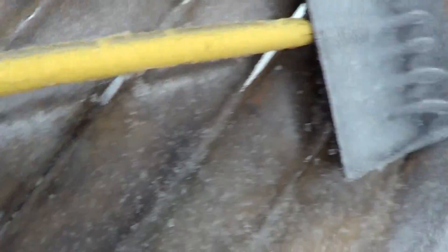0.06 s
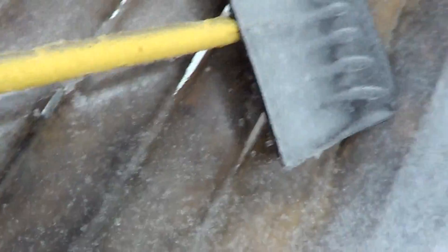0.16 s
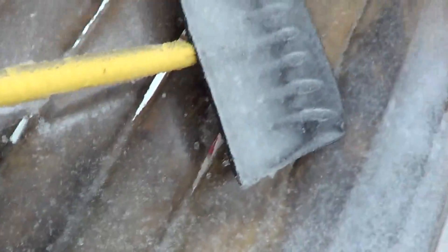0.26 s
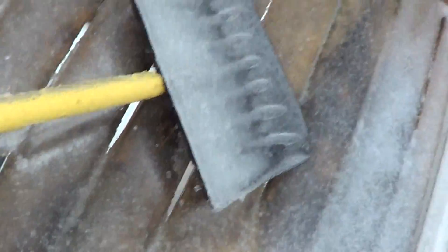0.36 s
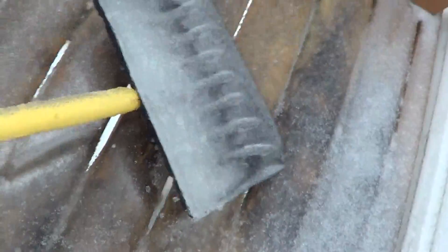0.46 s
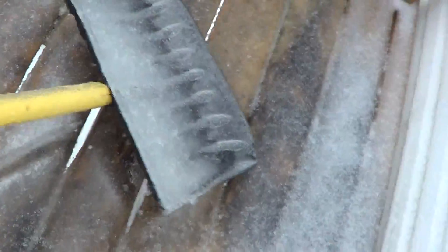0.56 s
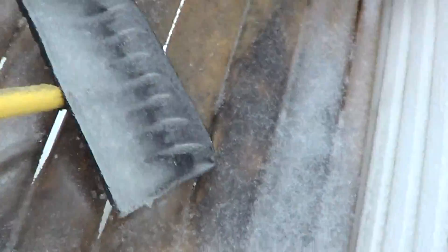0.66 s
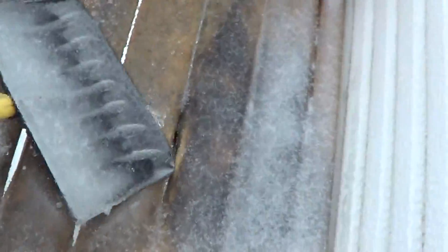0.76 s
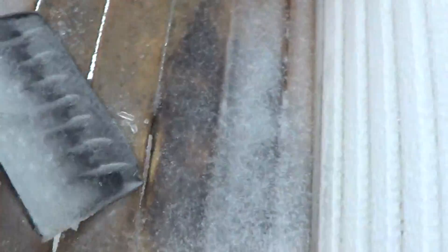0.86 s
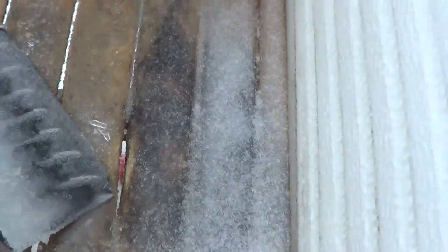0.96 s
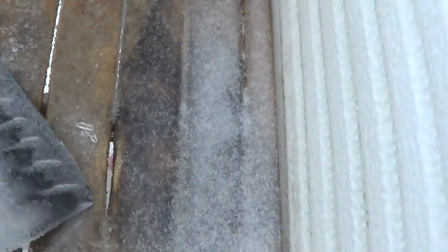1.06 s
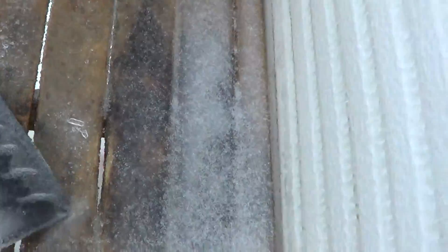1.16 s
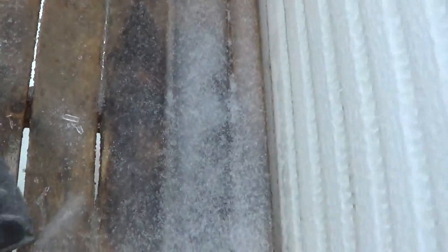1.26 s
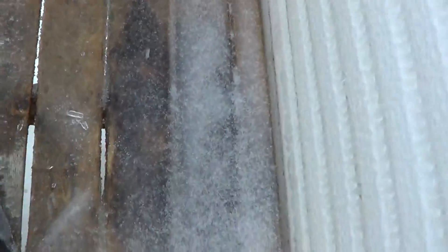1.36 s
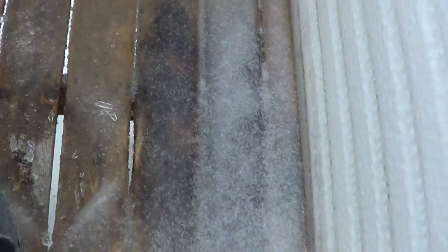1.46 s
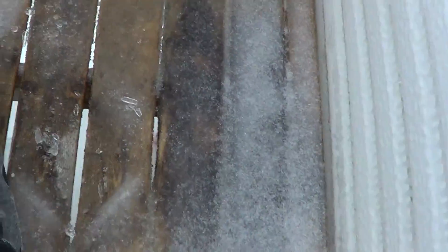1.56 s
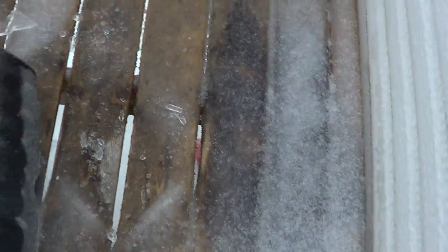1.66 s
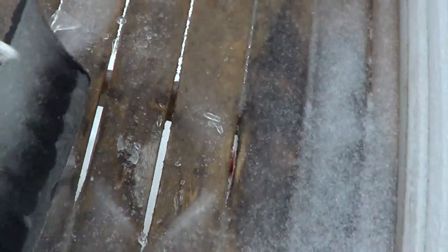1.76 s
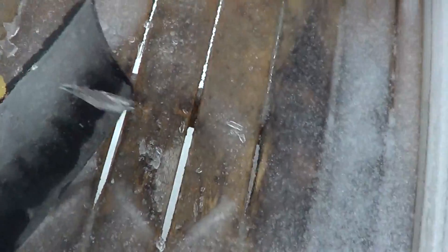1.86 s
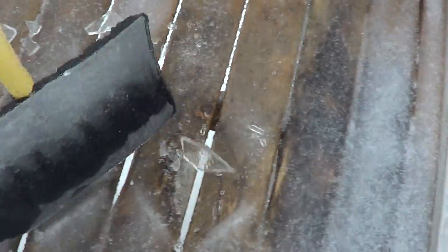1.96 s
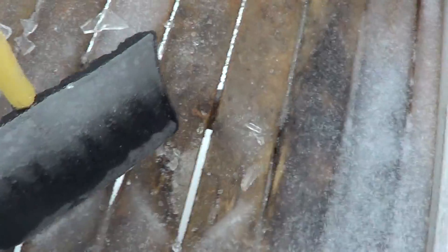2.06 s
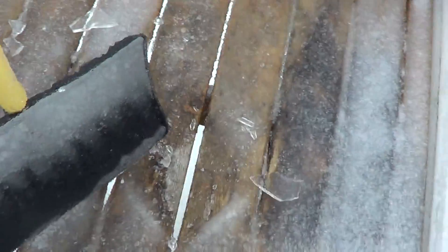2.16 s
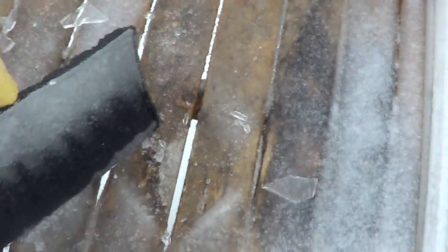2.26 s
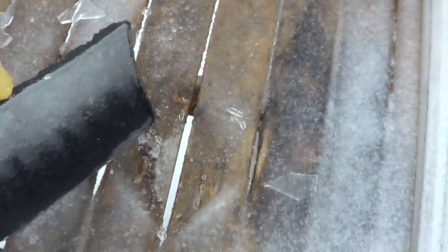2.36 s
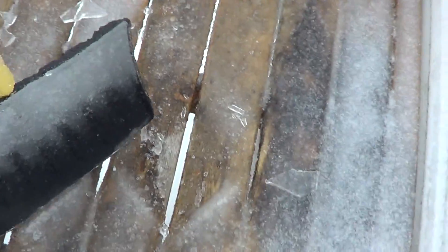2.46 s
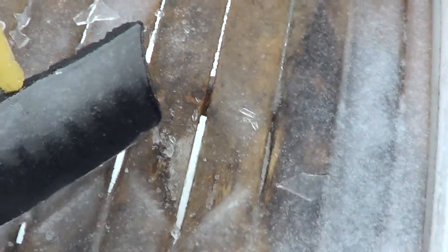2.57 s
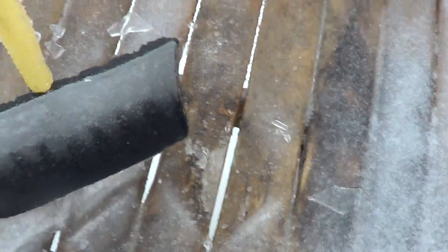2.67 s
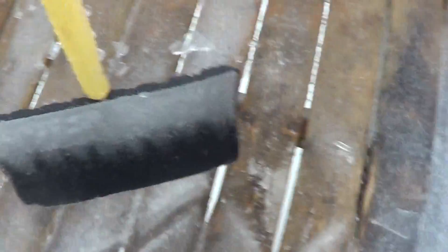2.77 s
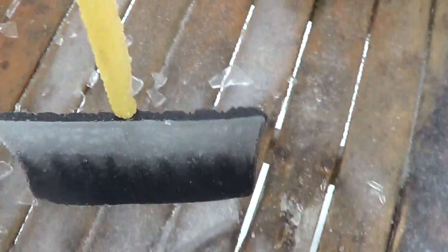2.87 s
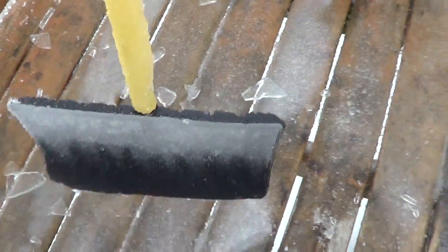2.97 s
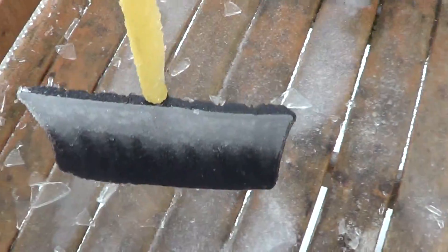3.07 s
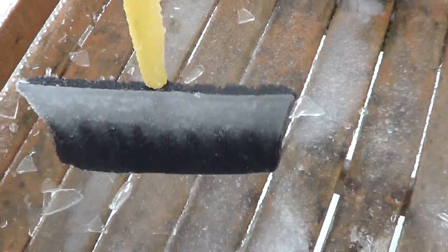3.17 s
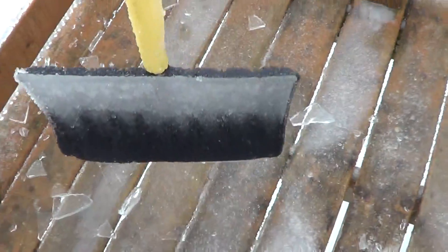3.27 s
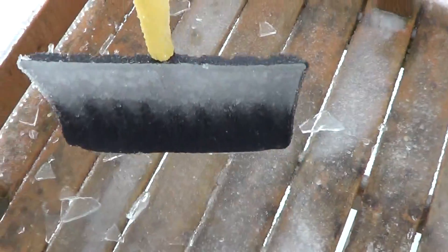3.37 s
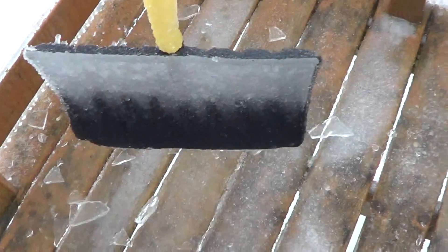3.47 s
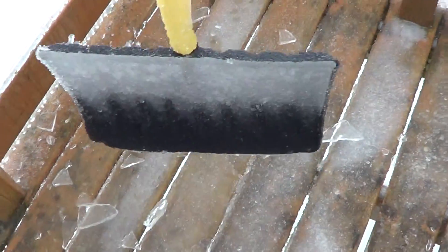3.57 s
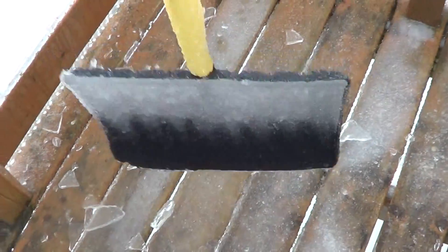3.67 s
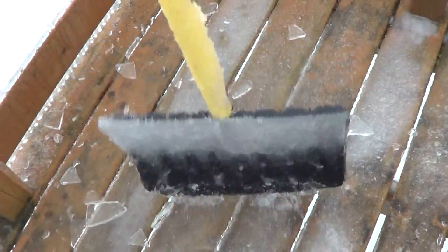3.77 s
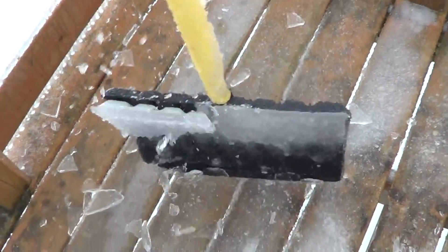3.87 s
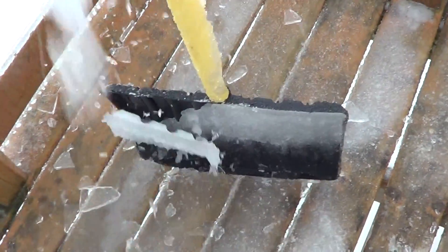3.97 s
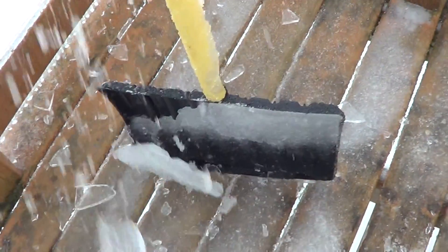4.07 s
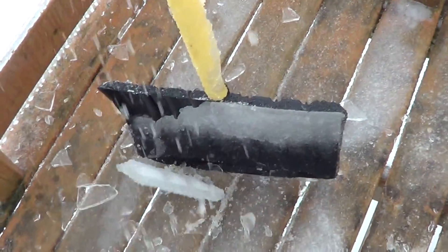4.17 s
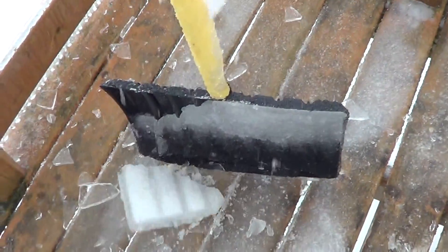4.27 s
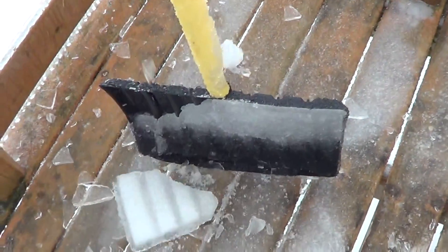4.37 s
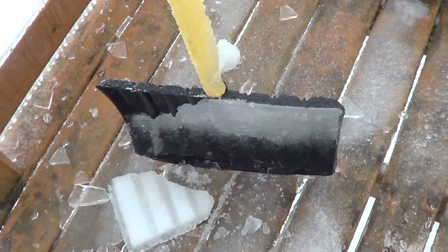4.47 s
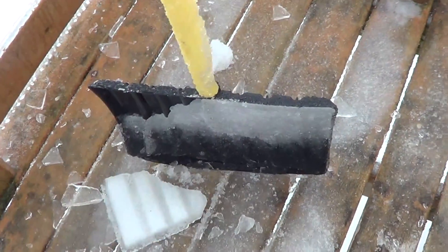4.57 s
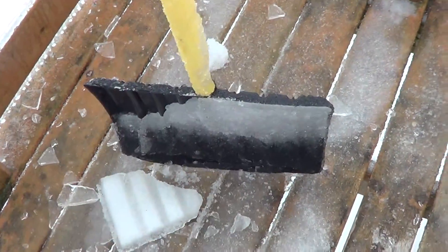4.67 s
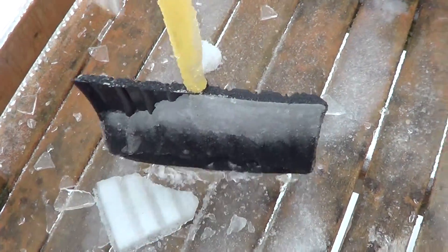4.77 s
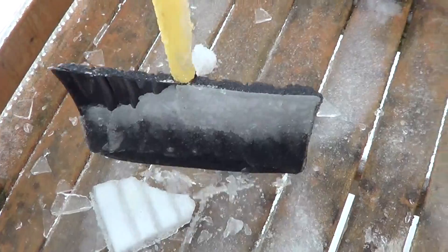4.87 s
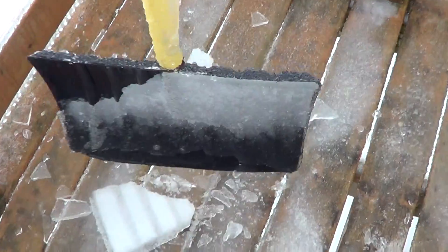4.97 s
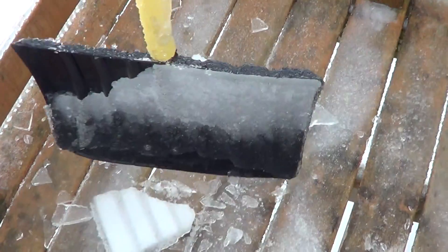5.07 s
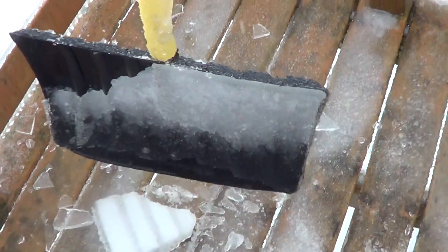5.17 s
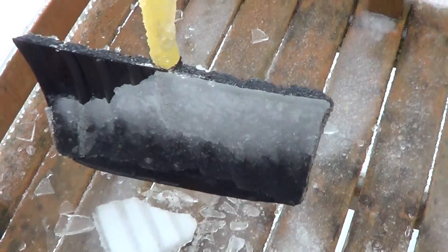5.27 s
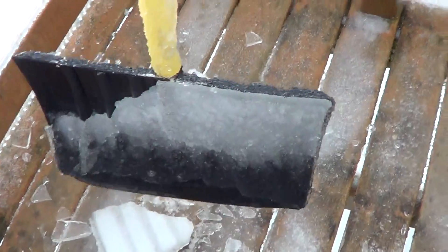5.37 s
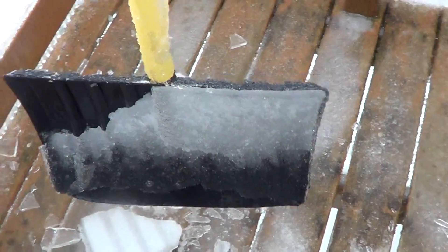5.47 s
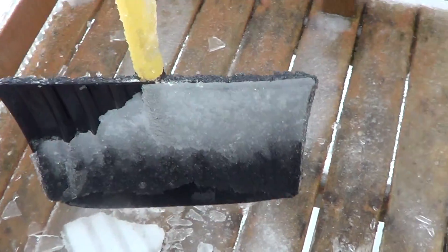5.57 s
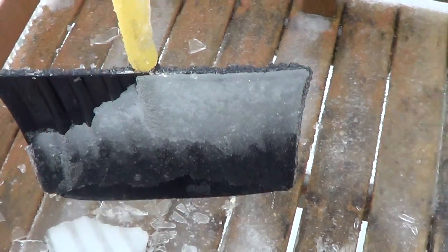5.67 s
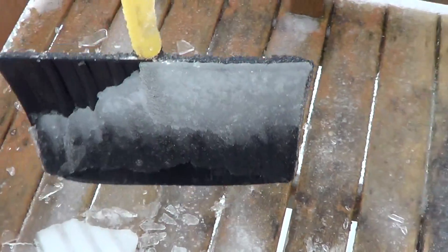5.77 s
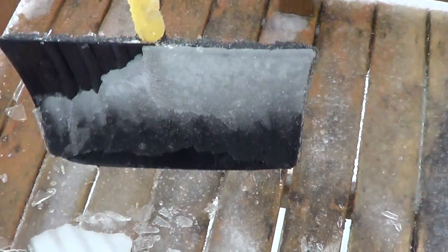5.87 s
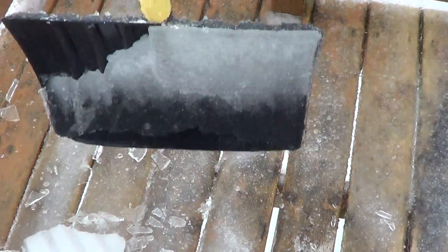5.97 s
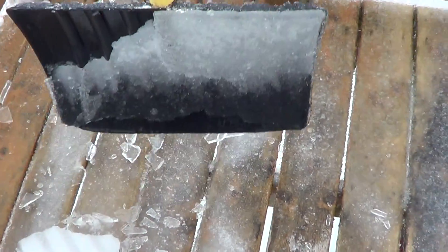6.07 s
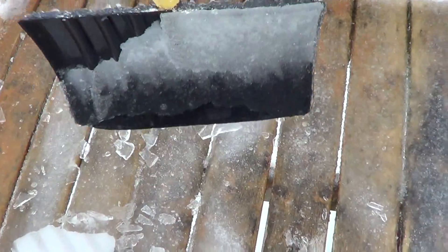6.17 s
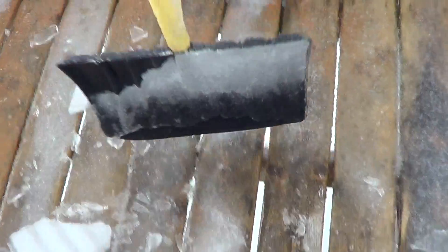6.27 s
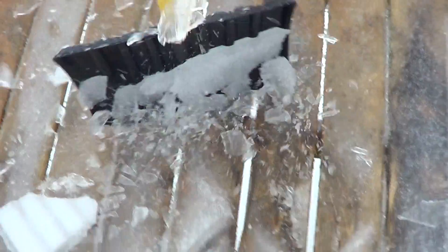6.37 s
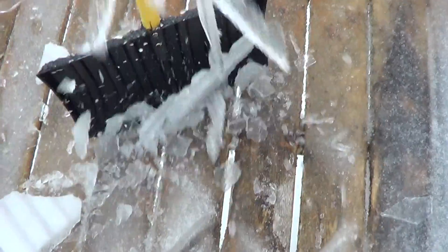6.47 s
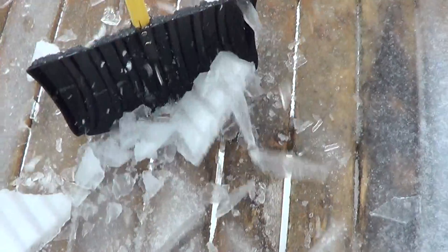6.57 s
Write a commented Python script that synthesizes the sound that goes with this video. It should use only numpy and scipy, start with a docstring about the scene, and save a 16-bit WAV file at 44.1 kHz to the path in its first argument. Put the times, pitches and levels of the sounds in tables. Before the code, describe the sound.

From the start to about 1.7 seconds a plastic shovel blade grinds over an iced wooden deck in short uneven bites, gritty and bright on top with a duller plastic shudder below, peppered with sharp ice snaps. Around 1.85 to 2.4 seconds come brittle cracks, a wooden knock at 2.05, and a thin loose pane clinking as it skips away. The activity fades by 2.7, leaving sparse tiny ticks. At 3.8 a hard hollow knock bursts the ice crust; fragments spray, and slabs thud and crack at about 4.15 to 4.4. Falling crumbs thin out through 5 to 6.2 seconds, with a crack near 5.0 and a faint bump at 5.4. At 6.34 another blow smashes ice in a dense crunch with snaps until the end at 6.6. Close, outdoors, with short echoes, light low wind buffeting, faint hiss and a barely audible high whine.

```python
"""A plastic snow shovel scrapes an iced wooden deck, then knocks on the boards so that its ice crust bursts.
The scrape is made of dense random grains: splinters ringing on top, the duller blade shaken below.
Snaps with crumbling ticks make the cracks and crumbs; struck modes make the slab thuds and one loose ice pane.
Each thud jolts the deck with low noise, and a scatter of decaying noise gives the nearby echoes.
Behind it, shaped noise makes wind rumble on the microphone ports and faint outdoor hiss, with a thin high whine."""
import sys
import numpy as np
from scipy import signal
from scipy.fft import rfft, irfft
from scipy.io import wavfile

SR = 44100
rng = np.random.default_rng(int(sys.argv[2]) if len(sys.argv) > 2 else 0)


def dump(signal):
    """Clip the signal to [-1, 1] and save it as 16-bit WAV at the path in sys.argv[1]."""
    limited = np.clip(np.atleast_2d(signal).T, -1, 1)
    pcm = np.round(limited * 32767).astype(np.int16)
    wavfile.write(sys.argv[1], SR, pcm)


def nominal_scale(level):
    """Amplitude ratio for a level in decibels (scalar or array-like)."""
    x = np.asarray(level, float) / 20
    return 10 ** x


N = 291501   # samples


def rms_one(x):
    """Scales a signal to rms 1."""
    return x / np.sqrt(np.mean(x ** 2) + 1e-20)


def in_time(rows):
    """Draws straight lines between timed rows, one curve per column after the time."""
    s, *columns = np.transpose(rows)
    return [np.interp(np.arange(N) / SR, s, c) for c in columns]


def colour(x, spectrum):
    """Causal filter with the given spectrum (folded cepstrum); unit power gain."""
    size = 2 ** 12
    hz, db = np.transpose(spectrum)
    bins_hz = np.arange(size // 2 + 1) * SR / size
    gain_db = np.interp(np.log(bins_hz + 1), np.log(hz), db)
    cepstrum = irfft(np.log(nominal_scale(gain_db)))
    cepstrum[1:size // 2] *= 2
    cepstrum[size // 2 + 1:] = 0
    pulse = irfft(np.exp(rfft(cepstrum)))
    pulse = np.atleast_2d(pulse / np.linalg.norm(pulse))
    return signal.fftconvolve(x, pulse, axes=1)[:, :x.shape[1]]


def drift(rate_hz):
    """Slow random wander of rms 1: noise through two equal low-pass poles, made at SR / 20."""
    r = np.exp(-2 * np.pi * rate_hz * 20 / SR)
    noise = rng.standard_normal(N // 20 + 3002)
    slow = signal.lfilter([1], [1, -2 * r, r * r], noise)[3000:]   # without the filter's start
    return np.interp(np.arange(N) / 20, np.arange(len(slow)), rms_one(slow))


def ring(clicks, hz, t60):
    """Two-pole resonator: a unit click sets a dying sine of initial height 1 ringing."""
    r = nominal_scale(-60 / (t60 * SR))
    w = 2 * np.pi * min(hz, SR / 2.2) / SR
    return signal.lfilter([0, np.sin(w)], [1, -2 * r * np.cos(w), r * r], clicks + 1e-18)


def sides(pan_db):
    """Left and right gains for a left-right level difference in dB."""
    return nominal_scale(np.array([pan_db, -pan_db]) / 2)


# fine ice trickling and settling between the bites: [t/s, splinter level/dB, blade level re splinters/dB]
TRICKLE_ROWS = [(0.0, -43, 5.5), (0.15, -49.5, 1), (0.5, -43.5, -2.5), (0.65, -38, -1), (1.47, -38.5, 2.5),
                (1.85, -41, -7), (1.95, -53, -2), (2.05, -38.5, -0.5), (2.3, -36.5, -2.5),
                (2.43, -50.5, -0.5), (2.66, -54, 0), (2.7, -57, -6), (2.83, -49, -9.5), (3.08, -60.5, -12),
                (3.8, -60, -12), (3.83, -35.5, -5), (4.55, -37.5, -4), (4.6, -44, -8), (5.24, -46, -9),
                (5.36, -56, -13), (6.15, -58.5, -11), (6.32, -45.5, -6), (6.34, -25, -2), (6.61, -25, -5)]
# the edge bites into the crust, ploughs and lets go: [t/s, hold/s, splinter level/dB, blade level re splinters/dB]
BITE_ROWS = [(0.022, .015, -30, 4), (0.186, 0.048, -27, -1), (0.242, 0.14, -32, -2.5),
             (0.356, 0.0081, -28, 0), (0.383, 0.047, -39, 5), (0.436, 0.023, -29.5, -2.5),
             (0.575, 0.037, -40, 6.5), (0.621, 0.035, -32, 5.5), (0.687, 0.033, -25.5, -7),
             (0.731, .05, -29.5, 7), (0.779, 0.039, -20.5, -3.5), (0.834, .11, -29, 3),
             (0.958, 0.047, -36.5, 5.5), (1.04, 0.059, -29.5, 4.5), (1.109, 0.051, -24, -0.5),
             (1.185, 0.026, -23.5, 3), (1.251, .17, -22.5, 0), (1.429, 0.016, -32, 1),
             (1.501, 0.049, -22, -1.5), (1.588, 0.019, -22.5, -0.5), (1.634, 0.025, -27.5, 1.5),
             (1.667, 0.035, -38, -3), (1.763, 0.025, -40.5, 4), (1.842, 0.016, -26.5, 5),
             (1.869, 0.031, -31, -1.5), (2.001, 0.0068, -33, -6), (2.023, 0.0094, -34.5, 4),
             (2.119, 0.042, -29.5, -2), (2.145, 0.029, -20.5, -3.5), (2.291, 0.023, -23, -4),
             (2.327, 0.029, -28.5, -2.5), (2.491, 0.016, -39.5, -0.5), (2.589, 0.012, -40, 7),
             (2.628, 0.017, -33.5, 4.5), (3.639, 0.066, -50.5, -12), (4.148, 0.013, -22.5, -4),
             (4.198, 0.058, -32.5, -4.5), (4.365, 0.028, -22.5, 0), (4.421, 0.022, -28, -8),
             (4.94, 0.1367, -45, -3), (6.4, .02, -23.5, 1), (6.447, 0.043, -20.5, -3),
             (6.522, 0.037, -21.5, -9), (6.565, 0.057, -20, -1)]
# the crust bursts under a blow: [t/s, fall/s per 20 dB, splinter level/dB, blade level re splinters/dB]
BURST_ROWS = [(2.054, 0.0255, -23.5, -10), (3.813, 0.1123, -15.5, -3), (3.86, 0.0158, -23, -1),
              (3.89, 0.1038, -23.5, -2), (4.302, 0.0649, -20.5, -6.5), (6.338, 0.14, -16, -1)]
BITE_RISE_S, BITE_FALL_S, BURST_RISE_S = 0.024, 0.025, 0.0023   # time to swell or sink by 20 dB


def effort():
    """Trickle, bites and bursts add in power; gives splinter level and blade level re splinters, in dB."""
    trickle_db, body_db = in_time(TRICKLE_ROWS)
    ice_power = nominal_scale(2 * trickle_db)
    body_power = nominal_scale(2 * (trickle_db + body_db))
    t = np.arange(N) / SR
    surges = [(s, BITE_RISE_S, hold_s, BITE_FALL_S, *level) for s, hold_s, *level in BITE_ROWS]
    surges += [(s, BURST_RISE_S, 0, fall_s, *level) for s, fall_s, *level in BURST_ROWS]
    for s, rise_s, hold_s, fall_s, db, blade_db in surges:
        start, end = s - 4 * rise_s, s + hold_s + 4 * fall_s   # from and to 80 dB down
        near = slice(max(0, round(start * SR)), round(end * SR))
        before = (s - t[near]) / rise_s
        after = (t[near] - s - hold_s) / fall_s
        below = np.maximum(before, after).clip(0)
        surge = nominal_scale(2 * (db - 20 * below))
        ice_power[near] += surge
        body_power[near] += surge * nominal_scale(2 * blade_db)
    return 10 * np.log10(ice_power), 10 * np.log10(body_power / ice_power)


def grains(per_s, density, spread_db, low_hz, high_hz, cycles, wide_db, clump_db, patchy_db, count):
    """Random fractures of uneven size, each ringing for a few cycles at its own pitch and place; rms 1."""
    sizes = nominal_scale(spread_db * np.minimum(rng.exponential(1, N), 4)) / np.sqrt(density)
    sizes = sizes * rng.choice([-1, 1], N)
    chance = per_s * density * nominal_scale(clump_db * drift(40)) / SR
    born = rng.random(N) < chance
    clicks = sizes * born * sides(wide_db * rng.standard_normal(N))
    dealt = rng.integers(0, count, N)   # which pitch each grain gets
    out = 0
    for k, hz in enumerate(np.geomspace(low_hz, high_hz, count)):
        favoured = nominal_scale(patchy_db * drift(3.74))   # piece sizes come and go, so the colour shifts
        out = out + hz * ring(clicks * (dealt == k) * favoured, hz, cycles / hz)
    return rms_one(out)


# colour of crushed splinters: [f/Hz, level/dB per Hz]
GRIT_SPECTRUM = [(2700, -20), (4600, -6.5), (6000, -3.5), (8100, -0.5), (10100, 0), (13100, -5.5),
                 (15600, -12)]
# colour of the shaken blade, under crushing and cracks alike: [f/Hz, level/dB per Hz]
BLADE_SPECTRUM = [(120, -32.5), (200, -12), (360, -3.5), (780, 0), (1100, 0), (2550, 2), (3700, -0.5),
                  (4500, -7), (11000, -48)]


def crush(ice_db, body_db):
    """Splinters hiss and tick on top; the same crushing effort shakes the duller blade below."""
    # hard crushing fuses into a roar, light trickling ticks singly
    density = nominal_scale(np.clip(.6 * (ice_db + 21.5), -22, 3))
    fine = grains(9000, density, 6.1, 3700, 17400, cycles=4.3,
                  wide_db=2.5, clump_db=3.0, patchy_db=5.5, count=14)
    coarse = grains(5000, density, 3.25, 447, 5340, cycles=9.8,
                    wide_db=2.0, clump_db=2.5, patchy_db=3.0, count=16)
    rub = rng.standard_normal((2, 1, N))
    fine = rms_one(colour(fine + nominal_scale(-0.5) * rub[0], GRIT_SPECTRUM))
    coarse = rms_one(colour(coarse + nominal_scale(0.5) * rub[1], BLADE_SPECTRUM))
    judder = nominal_scale(0.85 * drift(44.0))   # the edge grips and slips
    return nominal_scale(ice_db) * (fine + nominal_scale(body_db) * coarse) * judder


CRUMBS_PER_S, CRUMB_ABOVE_DB, CRUMB_SPREAD_DB = 24, 11, 9.0   # levels above the trickle
CRUMB_LOW_HZ, CRUMB_HIGH_HZ = 6400, 12200   # shard pitch
CRUST_LOW_HZ, CRUST_HIGH_HZ = 830, 4140     # pitch of the crust on the blade


def crumbs():
    """Small crumbs drop at random all the time: chance crack rows, level and blade share following the trickle."""
    when, size, pitch, place = rng.random((round(CRUMBS_PER_S * N / SR), 4)).T
    trickle_db, body_db = np.array(in_time(TRICKLE_ROWS))[:, (when * N).astype(int)]
    level_db = trickle_db + CRUMB_ABOVE_DB + CRUMB_SPREAD_DB * size
    shard_hz = CRUMB_LOW_HZ * (CRUMB_HIGH_HZ / CRUMB_LOW_HZ) ** pitch
    blade_hz = CRUST_LOW_HZ * (CRUST_HIGH_HZ / CRUST_LOW_HZ) ** place
    return np.transpose([when * N / SR, level_db, shard_hz, blade_hz, body_db])


# cracks and falling shards, levels before colouring:
# [t/s, level/dB, shard f/Hz, f/Hz of the crust still on the blade, blade level re shard/dB]
CRACK_ROWS = [(.0272,-11.5,8400,1130,10),(.0623,-24,8600,794,-3),(.1082,-27,8400,807,3),(.1695,-23.5,8500,1250,8.5),
              (.1865,-26,10100,2340,9.5),(.3646,-11.5,6400,1430,1),(.4661,-10.5,4960,1550,-3),(.5294,-23,9100,1040,-3),
              (.6095,-19,8900,2250,3),(.7015,-13.5,7960,2820,12),(.7134,-10.5,8360,1420,2.5),(.8606,-23,7990,2700,2),
              (.9233,-11.5,8440,2720,7),(1.0373,-14,7700,1580,1),(1.1106,-13.5,8260,1920,8),(1.186,-24,8550,2790,-8),
              (1.258,-14,8980,2840,4),(1.3547,-7,8300,3300,5),(1.488,-5.5,5220,2700,2),(1.506,-8.5,8010,1690,-2),
              (1.5865,-10,7800,2900,4.5),(1.6516,-20,9100,3020,5),(1.719,-16,9500,1080,-11),(1.7584,-19.5,11600,3020,3.5),
              (1.8056,-22,10100,2850,-6),(1.832,-16,8700,1920,0),(1.8457,-11.5,8600,1590,3),(1.8906,-4.5,10600,3600,-8),(1.94,-17,10900,2110,-18),
              (2.0203,-20,8070,810,3),(2.0536,-6.5,9800,1880,-2),(2.1194,-13,8200,2420,-12),(2.2184,-7,7100,2020,-3.5),
              (2.241,-6.5,10600,3400,-7),(2.2744,-5,10200,3120,-7),(2.3365,-5,5900,2860,-8),(2.394,-24,9500,3300,-18),
              (2.4074,-34,7340,3280,-13),(2.459,-24,8070,830,-3),(2.586,-22,10400,2430,2),(2.6184,-25,9000,1550,1),
              (2.6544,-14,6000,830,-11),(2.7611,-16.5,9200,3400,-4),(2.834,-29.5,9000,3230,-0.5),(2.8684,-19,6600,1410,-10),
              (2.9814,-36,8600,791,-17),(3.2935,-29.5,6040,829,-23),(3.3203,-33,8800,3840,-4),(3.432,-26,7840,3200,-12),
              (3.455,-29.5,6940,3300,-20),(3.6083,-30,9600,3560,-7),(3.6408,-27,10000,4140,-12),(3.8132,-9,8800,1560,-4),
              (3.892,-22,8680,2250,-10),(4.0244,-16,7040,3090,3),(4.066,-13,7290,2810,-12),(4.1086,-19,7780,3210,-14),
              (4.1238,-13,13700,2360,-19),(4.145,-2,10100,680,-2.5),(4.202,-10.5,10400,670,-4),(4.2712,-13.5,8190,786,-4),
              (4.3026,-7,6490,4130,1),(4.3274,-18,8800,920,-1),(4.3584,-11.5,9400,1240,2),(4.5081,-18.5,8300,810,0),
              (4.5446,-10.5,11800,3140,-10),(4.6084,-32,8700,850,2),(4.6444,-34,8080,2000,-9),(4.6644,-23,9460,825,-11),
              (4.795,-31,9320,1010,-4),(4.8468,-13.5,8600,1990,-11),(4.8743,-29,10300,1220,-10),(4.9162,-29,11000,2210,-3),(4.9433,-17,9800,2150,-12),
              (4.984,-19.5,5160,3260,-3),(4.9993,-29,9500,3630,12.5),(5.023,-6.5,9100,900,-20),(5.0686,-33,6860,764,-11),(5.087,-20,8600,754,-8),
              (5.134,-20,10600,750,-23),(5.1781,-15,7000,3950,-17),(5.214,-25,8610,4090,-32),(5.2372,-16.5,10300,4200,-20),
              (5.2716,-28,8900,3820,-18),(5.3163,-36,10500,4220,-2),(5.3423,-38,9600,1480,-12),(5.4146,-17.5,11000,4160,3.5),(5.4829,-28,9460,3770,-5),
              (5.5014,-19.5,7390,3920,-7),(5.561,-21.5,8600,3160,-7.5),(5.6435,-35,10300,703,-20),(5.697,-23,13500,3500,-11.5),
              (5.7474,-26.5,9400,703,-20),(5.8037,-21.5,7840,3780,-32),(5.861,-26,10200,1090,-18),(5.884,-27.5,10200,3680,-7),
              (5.9456,-30.5,9700,1630,-13),(5.9982,-24,13600,700,-25),(6.102,-30,8500,996,-16),(6.127,-26,9500,3200,-12),
              (6.2355,-26.5,8900,3910,-5),(6.2486,-18,9670,1540,-12.5),(6.2796,-27.5,9200,2110,-5),(6.3274,-19,8230,1650,-7.5),
              (6.4108,-20,10200,2090,-10),(6.5062,-8,7540,3280,-23),(6.524,-1.5,5300,3010,-10)]
# colour of snaps and shards: [f/Hz, level/dB per Hz]
SPLINTER_SPECTRUM = [(1760, -32), (3000, -14.5), (3900, -6.5), (4600, -7.5), (5820, -3.5), (10000, 2),
                     (14000, 0.5), (15600, -6.5)]


def cracks():
    """A sharp snap, then a crumble of ever weaker ticks: they ring the shard, hiss, and shake the blade."""
    span = SR // 8
    t = np.arange(span) / SR
    fade = nominal_scale(-60 * t / 0.0077) + nominal_scale(-1.5 - 60 * t / .05)   # quick, then slow crumbling
    bright, dull = np.zeros((2, N + span))
    for s, db, shard_hz, blade_hz, blade_db in [*CRACK_ROWS, *crumbs()]:
        size = np.minimum(rng.exponential(1, span), 4)
        sign = rng.choice([-1, 1], span)
        there = rng.random(span) < 6000 / SR   # 6000 ticks per second
        ticks = nominal_scale(4.14 * size - 16.5) * sign * there * fade
        ticks[:2] = nominal_scale(-0.5), -nominal_scale(-4.0)   # the break itself is one steep pulse
        shard = 0.32 * ring(ticks, shard_hz, 28.0 / shard_hz)
        shard += 0.41 * ring(ticks, 1.495 * shard_hz, 3.7 / shard_hz)
        blade = .15 * ring(ticks, blade_hz, 14.0 / blade_hz)
        i = round(s * SR)
        bright[i:i + span] += nominal_scale(db) * (shard + 1.33 * ticks)
        dull[i:i + span] += nominal_scale(db + blade_db) * (blade + 0.34 * ticks)
    both = colour(bright[None], SPLINTER_SPECTRUM) + colour(dull[None], BLADE_SPECTRUM)
    return both[:, :N]


def struck(blows, modes, soft_hz, rattle_s, offset_db):
    """Every blow is a short rattle of contacts that strikes each mode with a strength of its own."""
    out = np.zeros(N)
    middle_hz = np.median(np.array(modes)[:, 0])
    for hz, mode_db, t60 in modes:
        clicks = np.zeros(N)
        for s, db, tilt_db in blows:
            lag = np.array([0, *rng.uniform(0, rattle_s, 3)])
            hardness_db = tilt_db * np.log2(hz / middle_hz)
            strength_db = db + mode_db + offset_db + hardness_db + rng.normal(0, 4.06, 4)
            contacts = nominal_scale(strength_db) * [0.24, -0.75, 0.68, 0.56]
            np.add.at(clicks, ((s + lag) * SR).astype(int), contacts)
        out += ring(clicks, hz, t60)
    soft = np.exp(-2 * np.pi * soft_hz / SR)   # one-pole low-pass
    return signal.lfilter([1 - soft], [1, -soft], out)


# one loose ice pane skipping away: [t/s, relative level/dB, hardness/dB per octave]
SKIP_ROWS = [(2.2184, -28, -11), (2.242, -20.5, -5), (2.2749, -14, 2), (2.3365, -10.5, 1),
             (2.3794, -34, -8), (2.4094, -58, 2), (2.4394, -47, -8)]
# modes of the pane: [f/Hz, relative level/dB, t60/s]
PANE_MODES = [(2900, -20, .04), (3380, -2, 0.036), (5720, 3.5, 0.023), (8100, -10, .03), (10200, -3, .035),
              (13000, -13, .03)]


def loose_pane():
    """A thin ice pane clinks in a few short-lived high modes at each skip."""
    return struck(SKIP_ROWS, PANE_MODES, soft_hz=14000, rattle_s=0.0017, offset_db=-11.5)


# blade edge and slabs landing on the boards: [t/s, relative level/dB, hardness/dB per octave]
THUD_ROWS = [(0.018, -24, 18.5), (0.189, -28.5, 1), (1.185, -25, -7.5), (1.509, -37, 4), (1.841, -38, -1),
             (2.055, -11.5, 4), (2.241, -19.5, 7.5), (2.503, -29, 5.5), (2.565, -32.5, 9), (2.59, -31, 9),
             (2.645, -33, 6), (3.812, -12, 4), (3.892, -15.5, 3.5), (4.069, -35, 12), (4.145, -9, 2.5),
             (4.209, -25, 6), (4.274, -22, 6), (4.378, -22.5, -6), (5.415, -27, 0.5), (6.338, -21.5, -4),
             (6.445, -20.5, 0), (6.525, -25, 0)]
# modes of the boards with the blade on them: [f/Hz, relative level/dB, t60/s]
DECK_MODES = [(190, -7, .11), (240, -5, .1), (293, -1, .09), (345, 0, .07), (420, -3, .05), (510, -1, .05),
              (575, -1, .05), (660, 0, .06), (870, -6, .04), (1100, -8, .03)]


def thuds():
    """Blows ring the damped low modes of the boards through a soft contact."""
    boards = struck(THUD_ROWS, DECK_MODES, soft_hz=1480, rattle_s=0.01268, offset_db=-13.5)
    no_bass = signal.butter(4, 140, "high", fs=SR, output="sos")   # narrow boards radiate no deep bass
    return signal.sosfilt(no_bass, boards)


JOLT_DB, JOLT_HZ, JOLT_T60_S = -37.5, 69, 0.15   # level re thud row, band centre, decay


def jolts():
    """Each thud also jolts the whole deck underfoot: a short dying rumble of octave-wide noise."""
    hits = np.zeros(N)
    t = np.arange(SR // 4) / SR
    for s, db, _ in THUD_ROWS:
        hits[round(s * SR)] = nominal_scale(db + JOLT_DB)
    edges_hz = [JOLT_HZ / np.sqrt(2), JOLT_HZ * np.sqrt(2)]
    band = signal.butter(2, edges_hz, "band", fs=SR, output="sos")
    rumble = rms_one(signal.sosfilt(band, rng.standard_normal(N)))
    return rumble * signal.fftconvolve(hits, nominal_scale(-60 * t / JOLT_T60_S))[:N]


# colour of what comes back from the surroundings: [f/Hz, level/dB per Hz]
RETURN_SPECTRUM = [(60, 16), (150, 5), (400, -2), (1500, 1), (3000, -2), (4800, 5.5), (8000, 2.5),
                   (13000, -9)]


def nearby_echoes(x):
    """Boards, rail and wall return a thin scatter for tens of ms, mostly aside, so opposite in the two ears."""
    t = np.arange(SR // 8) / SR
    scatter = rng.standard_normal((2, len(t))) * nominal_scale(-60 * t / .07) * (t > .001)
    scatter /= np.linalg.norm(scatter, axis=1, keepdims=True)
    middle = x.mean(axis=0, keepdims=True)
    returned = signal.fftconvolve(middle, colour(scatter, RETURN_SPECTRUM), axes=1)[:, :N]
    ahead, aside = nominal_scale(-12.0) * returned
    return nominal_scale(-8) * ahead + aside * [[1], [-1]]


# wind on the ports, before its random lumps: [t/s, level/dB]
WIND_ROWS = [(0.0, -65), (0.37, -56.5), (0.68, -70), (1.01, -35), (1.08, -48), (1.29, -46.5), (1.64, -58.5),
             (2.52, -58), (2.91, -83), (3.13, -68), (3.3, -63), (3.42, -70), (3.96, -80), (4.36, -59),
             (4.6, -67), (4.97, -55.5), (5.1, -59), (5.16, -54), (5.43, -52), (5.61, -57), (5.78, -61.5),
             (5.93, -61), (5.98, -49), (6.15, -54.5), (6.42, -69), (6.54, -48), (6.61, -80)]
# colour of the wind rumble: [f/Hz, level/dB per Hz]
GUST_SPECTRUM = [(20, -47), (40, -22), (100, -6), (200, -9.5), (400, -14.5), (800, -52.5)]


def wind():
    """Lumpy low-frequency noise, partly shared and partly its own in each port."""
    level_db, = in_time(WIND_ROWS)
    noise = rng.standard_normal((3, N))
    rumble = rms_one(colour(noise[:2] + 1.2 * noise[2], GUST_SPECTRUM))
    lumps_db = 3.34 * np.array([drift(29), drift(27)])
    return nominal_scale(level_db + lumps_db) * rumble


# colour of the outdoor hiss: [f/Hz, level/dB per Hz]
AIR_SPECTRUM = [(24, -28), (40, -14.5), (302, 1.5), (378, -12.5), (474, 2), (2230, -9), (4590, -11),
                (9240, -21), (15600, -9.5)]
AIR_DB = -58   # rms
WHINE_HZ, WHINE_DB = 15734, -64   # the level is the sine's peak


def air():
    """Far outdoor hiss of shaped, partly shared noise, and a thin high sine whine."""
    noise = rng.standard_normal((3, N))
    hiss = nominal_scale(AIR_DB) * rms_one(colour(noise[:2] + 0.72 * noise[2], AIR_SPECTRUM))
    whine = nominal_scale(WHINE_DB) * np.sin(2 * np.pi * WHINE_HZ * np.arange(N) / SR)
    return hiss + whine


# where the blade is: [t/s, left-right level/dB]
PLACE_ROWS = [(0.0, -2), (0.22, 0), (0.61, 0), (1.34, 2.5), (2.45, -0.5), (2.85, 0.3), (6.61, 0.23)]


def scene():
    """Places ice and boards between left and right, then adds echoes, jolts, wind and air."""
    ice_db, body_db = effort()
    pan_db, = in_time(PLACE_ROWS)
    ice = crush(ice_db, body_db) + cracks() + loose_pane()
    near = ice * sides(pan_db) + thuds() * sides(-1.7)[:, None]
    return near + nearby_echoes(near) + jolts() + wind() + air()


def low_pass(x):
    """Removes everything above the highest recorded frequency."""
    return signal.sosfilt(signal.butter(12, 16850, fs=SR, output="sos"), x)


def record(dry):
    """Peaks are rounded softly, then the top is cut steeply above 15.8 kHz."""
    rounded = .62 * np.tanh(dry / .62)
    top_cut = signal.ellip(10, .5, 45, 15800, fs=SR, output="sos")   # .5 dB ripple, 45 dB stop band
    finished = signal.sosfilt(top_cut, rounded)
    return low_pass(finished)


dry = scene()
out = record(dry)
dump(out)
```